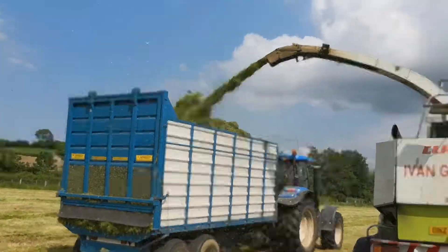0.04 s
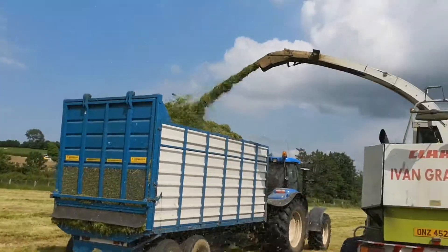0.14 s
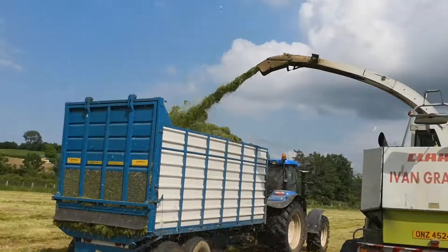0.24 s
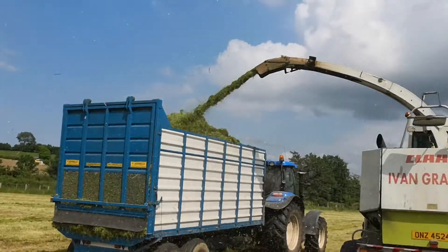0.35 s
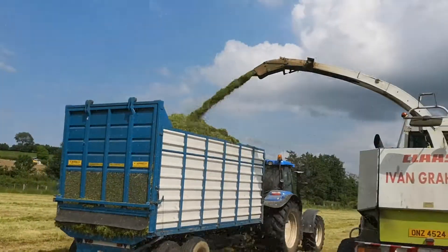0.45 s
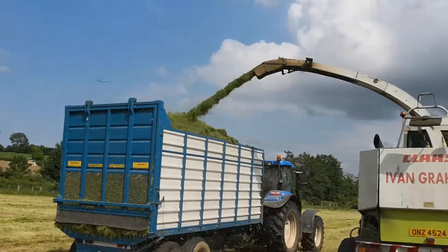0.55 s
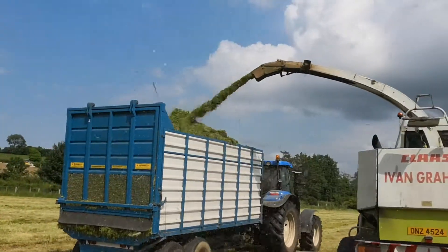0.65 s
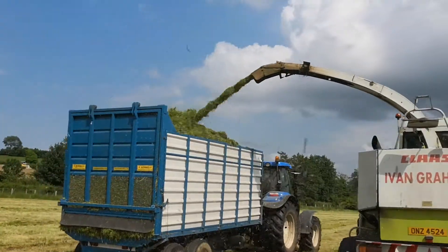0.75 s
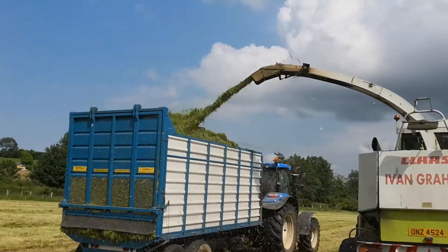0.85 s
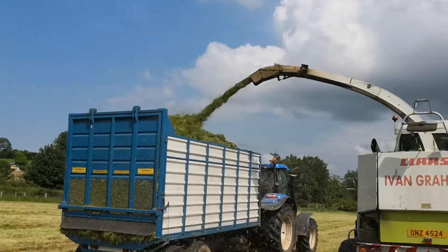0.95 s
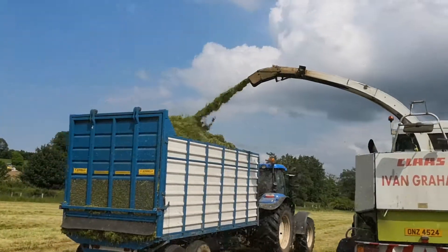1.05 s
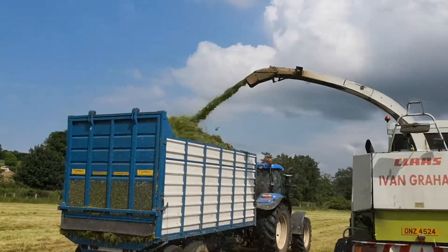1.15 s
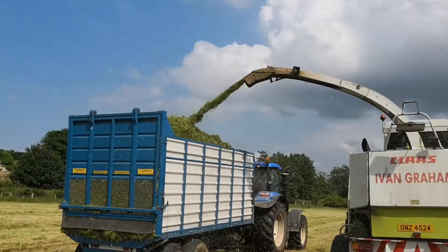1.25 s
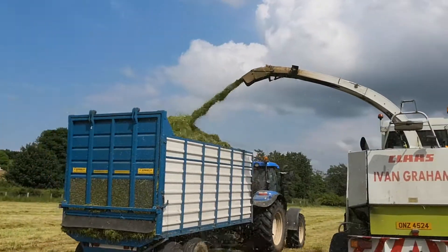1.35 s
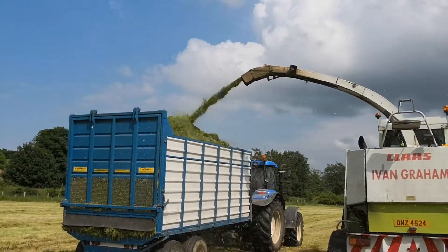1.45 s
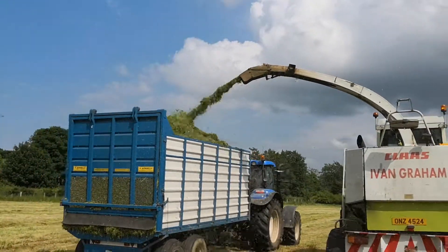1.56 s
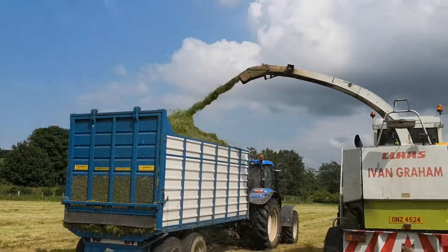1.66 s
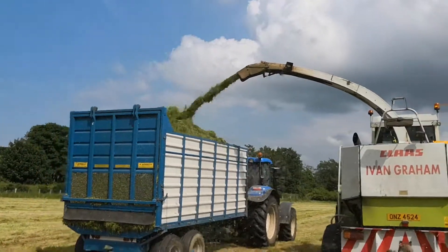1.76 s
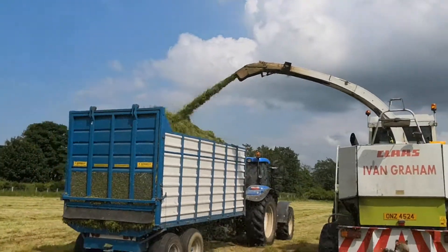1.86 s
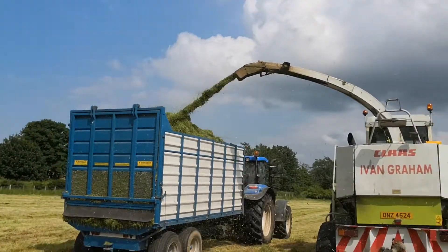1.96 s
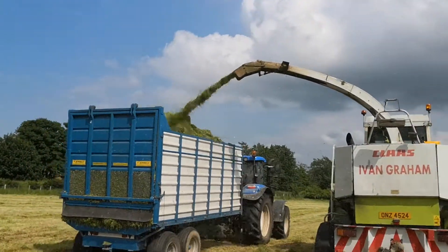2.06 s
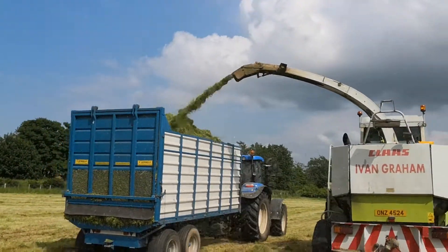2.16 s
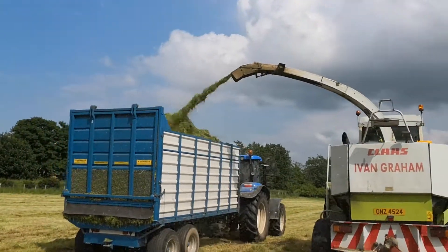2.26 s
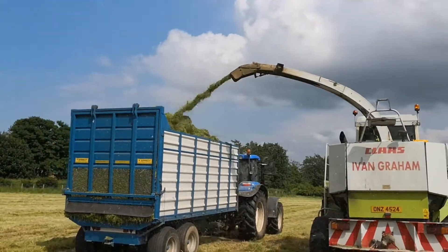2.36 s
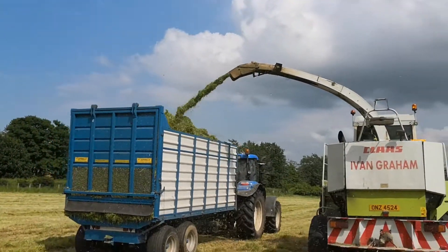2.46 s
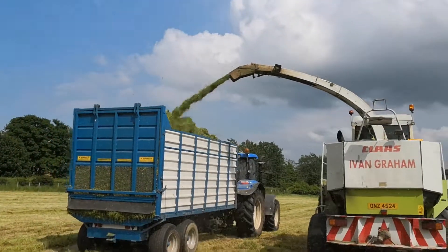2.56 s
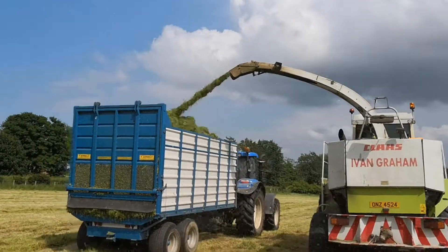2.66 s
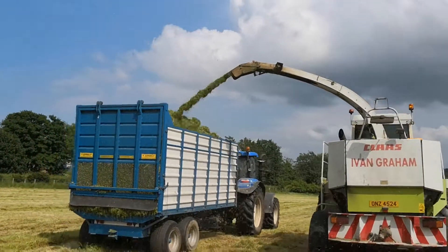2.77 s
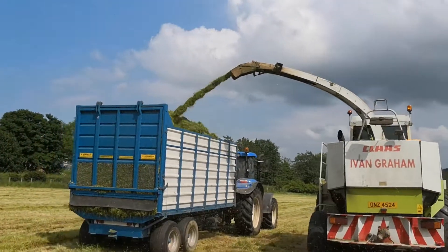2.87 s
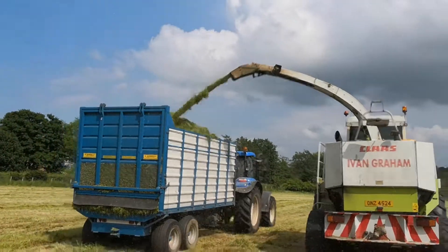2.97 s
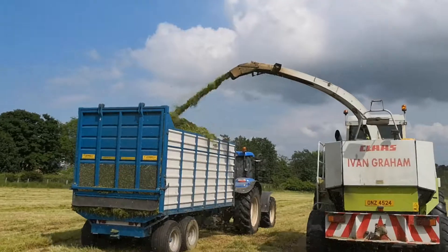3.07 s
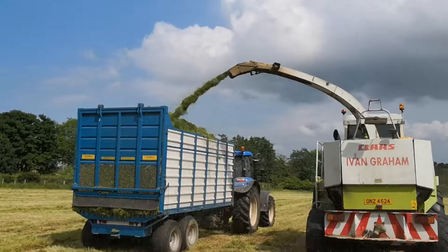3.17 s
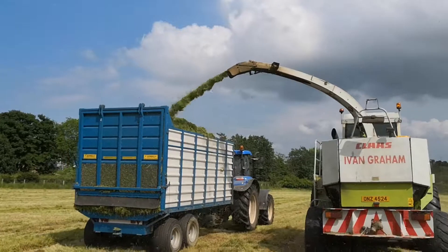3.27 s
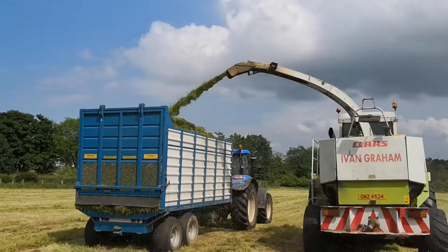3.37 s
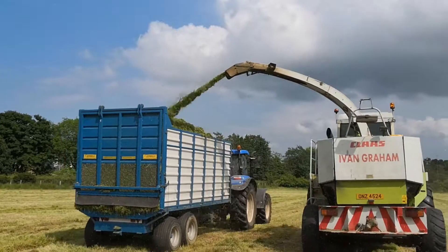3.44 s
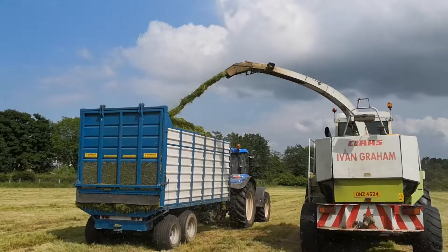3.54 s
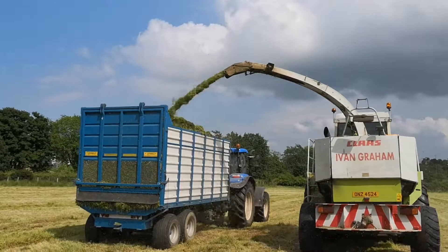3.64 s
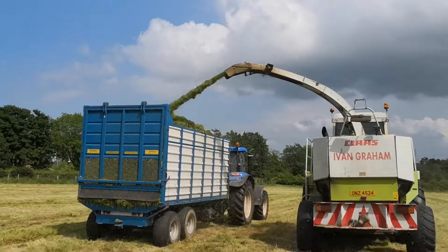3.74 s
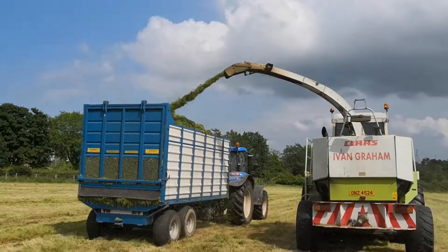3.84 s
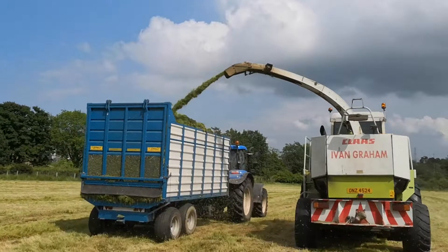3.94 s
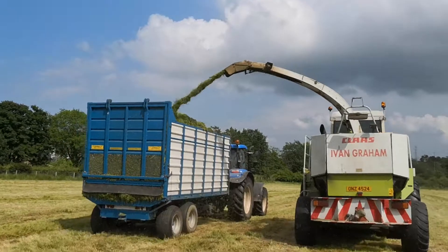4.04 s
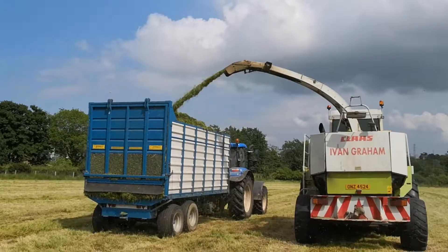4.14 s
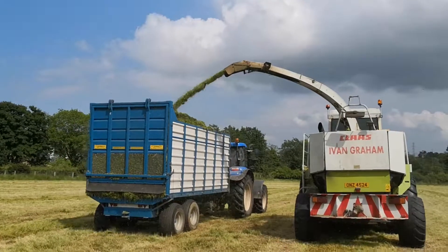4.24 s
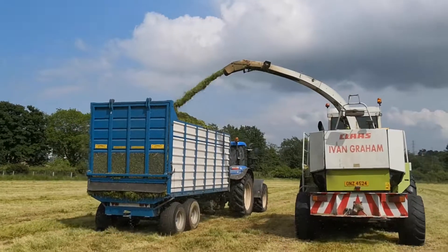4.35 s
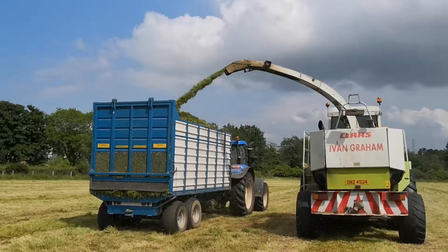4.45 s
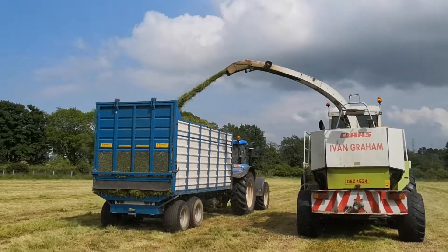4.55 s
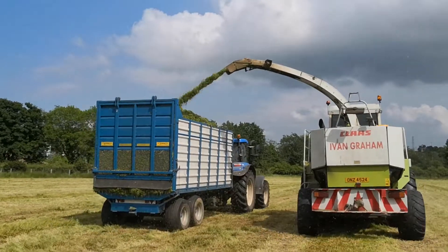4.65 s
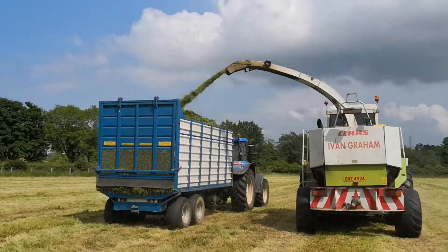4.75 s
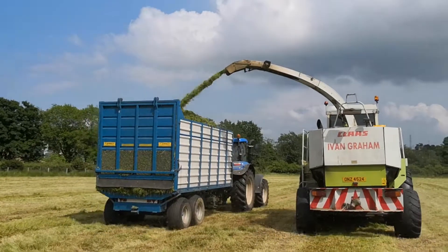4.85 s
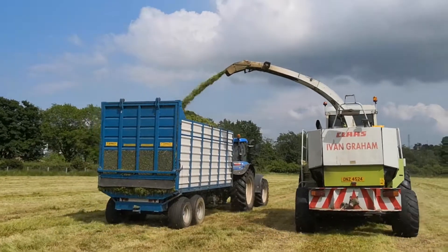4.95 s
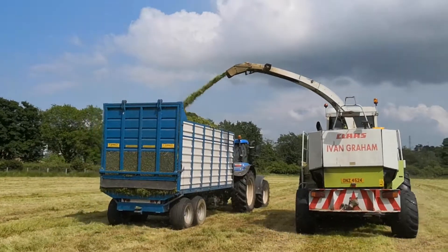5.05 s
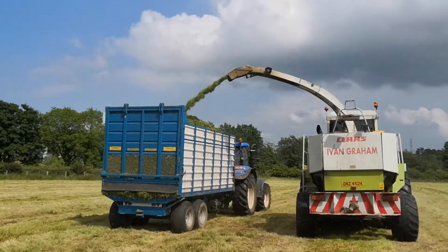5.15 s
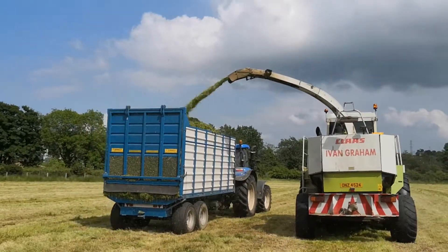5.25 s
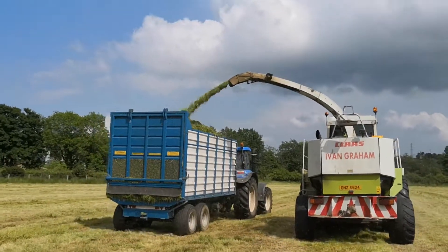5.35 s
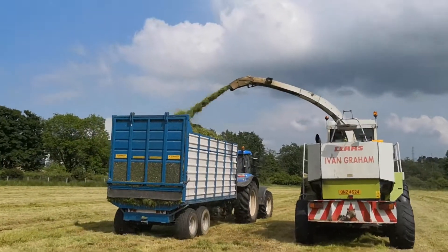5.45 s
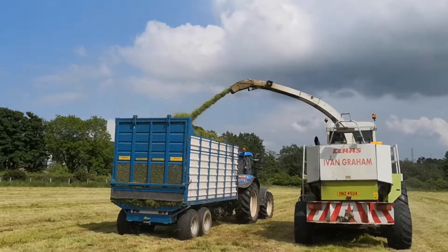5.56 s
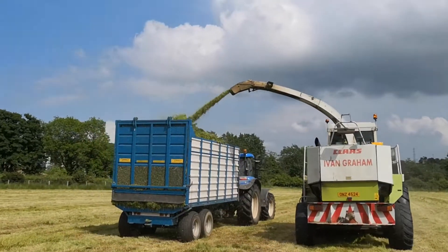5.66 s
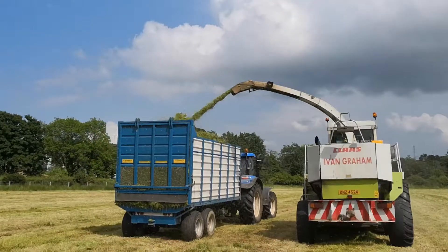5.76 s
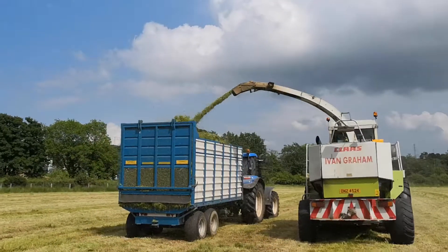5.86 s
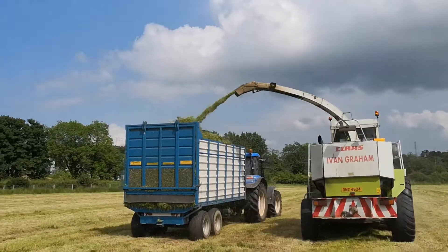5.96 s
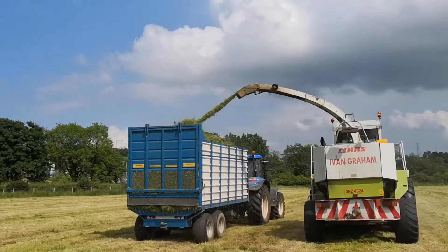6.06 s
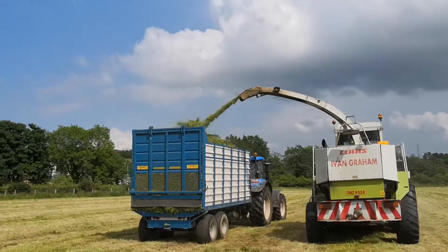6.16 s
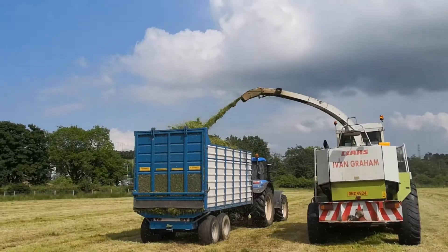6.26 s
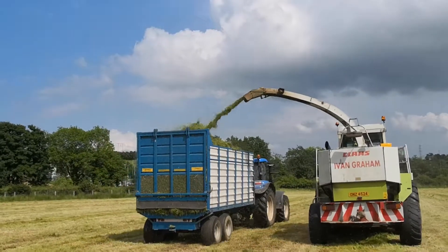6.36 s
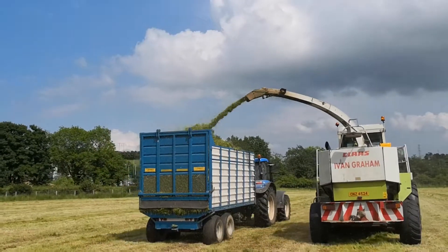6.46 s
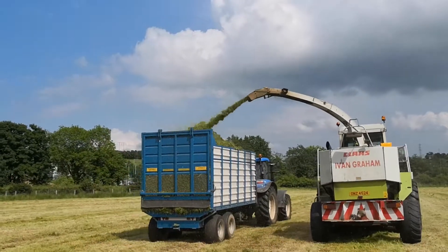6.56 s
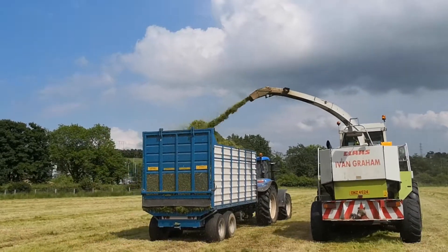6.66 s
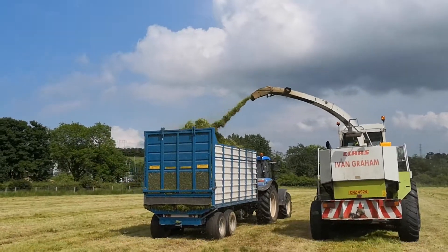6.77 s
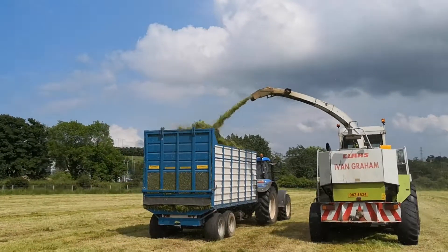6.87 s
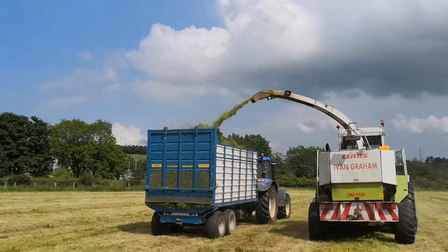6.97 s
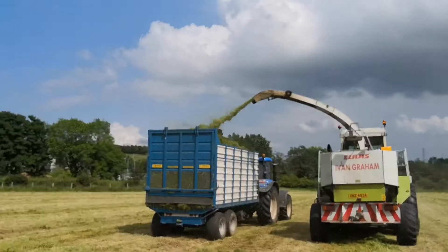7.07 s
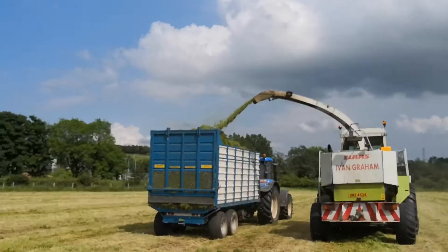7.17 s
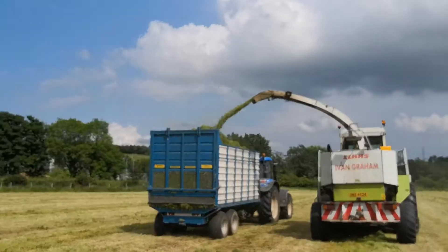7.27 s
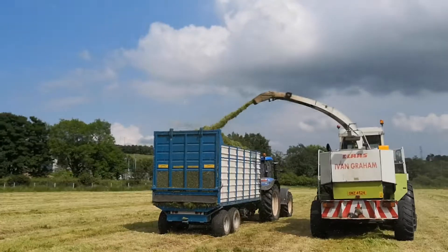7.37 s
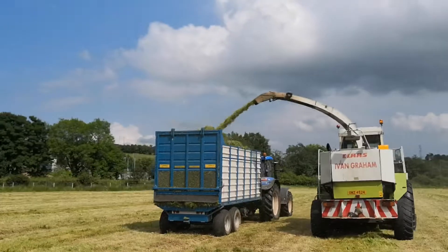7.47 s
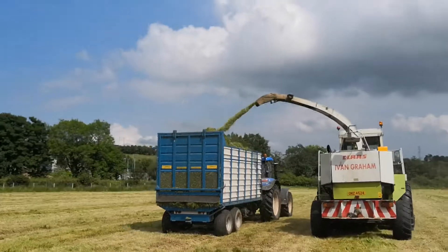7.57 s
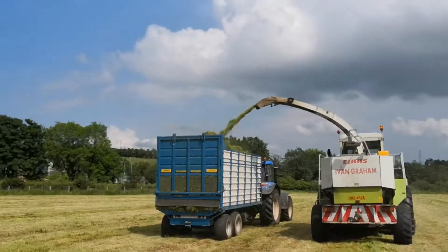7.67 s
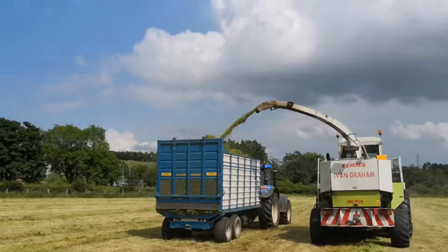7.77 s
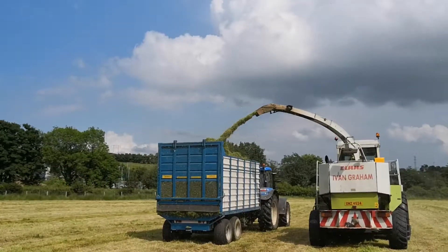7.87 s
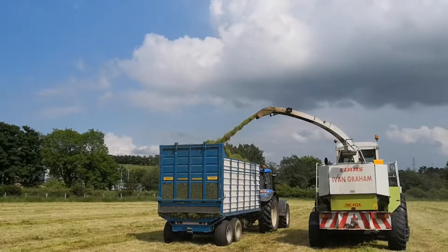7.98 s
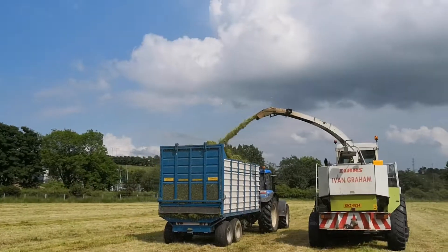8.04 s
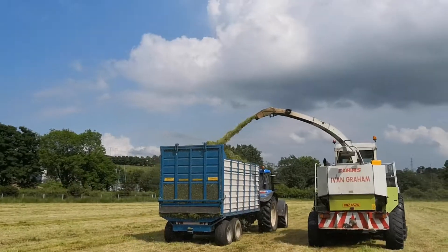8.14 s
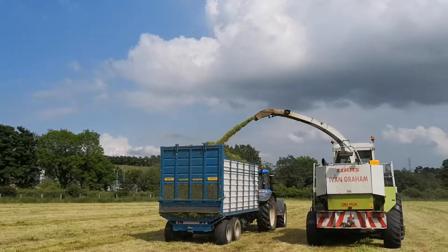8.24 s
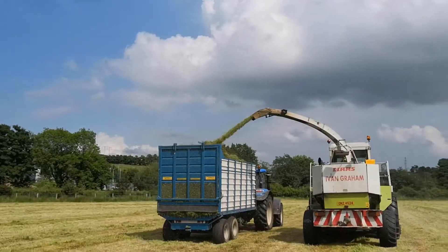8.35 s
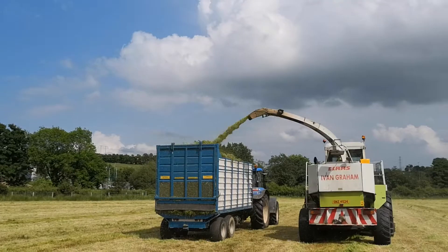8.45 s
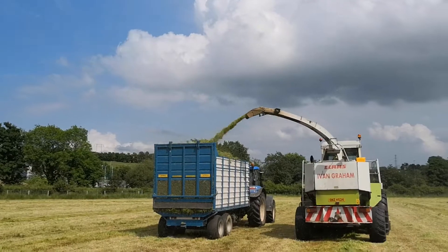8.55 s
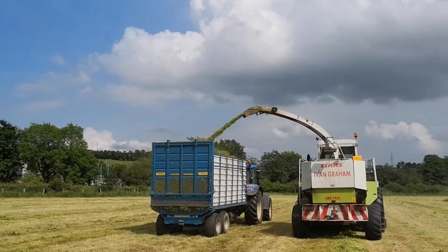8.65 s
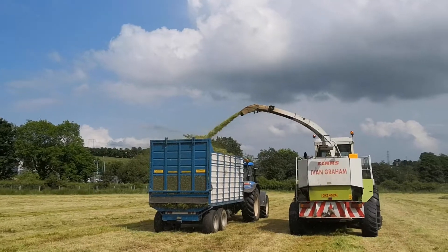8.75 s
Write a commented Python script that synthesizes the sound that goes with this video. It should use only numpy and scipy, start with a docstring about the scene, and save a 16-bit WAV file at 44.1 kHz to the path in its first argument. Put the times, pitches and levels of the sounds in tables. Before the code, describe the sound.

A forage harvester drones under load, roaring and hissing as it blows chopped grass into a trailer and slowly pulls away.

```python
"""Forage harvester driving away

An open field, two close microphone ports, and off to the left, some 12 m away, a harvester slowly
pulling off under load as it blows chopped grass into a trailer. Its eight-cylinder diesel and
belt-driven blower hunt up and down in speed together as the swath thickens and thins;
air and crop roar through the machine and hiss up the spout."""
import sys
import numpy as np
from scipy import signal
from scipy.fft import rfft, irfft, next_fast_len
from scipy.io import wavfile

SR = 44100
rng = np.random.default_rng(int(sys.argv[2]) if len(sys.argv) > 2 else 0)


def wrap_up_sound(samples):
    """Save the sound to the file named by the first command line argument, as 16-bit audio."""
    columns = np.atleast_2d(samples).T
    # keep every value between -1 and 1, then stretch to whole-number steps
    tamed = np.clip(columns, -1, 1)
    steps = np.round(tamed * 32767).astype(np.int16)
    wavfile.write(sys.argv[1], SR, steps)


N = 388521
TIME_S = np.arange(N) / SR


def from_db(db):
    """Decibels to gain."""
    return 10 ** (np.asarray(db) / 20)


def unit_rms(x):
    """Scale to unit rms."""
    return x / np.sqrt(np.mean(x ** 2) + 1e-20)


def dull(x, hz, order):
    """Roll off the treble above hz."""
    return signal.lfilter(*signal.butter(order, hz, fs=SR), x)


def in_time(rows):
    """The columns that follow a table's time column, one value per sample."""
    times, *columns = np.transpose(rows)
    return [np.interp(TIME_S, times, column) for column in columns]


def at_hz(rows, hz):
    """Read a table on a log-frequency axis."""
    row_hz, values = np.transpose(rows)
    return np.interp(np.log(hz + 1), np.log(row_hz + 1), values)


def drift(rate_hz):
    """Chance wandering: noise through a double one-pole low-pass, rms 1."""
    step = 40  # samples between points
    pole = np.exp(-2 * np.pi * step * rate_hz / SR)
    noise = rng.standard_normal(N // step + 2002)
    slow = signal.lfilter([1], [1, -2 * pole, pole * pole], noise)[2000:]
    return np.interp(np.arange(N) / step, np.arange(len(slow)), unit_rms(slow))


def swells(rows, floor_db, edge_s=.07):
    """Level in dB: a floor with swells that rise, hold and fall."""
    gain = from_db(floor_db)
    for start, length, level_db in rows:
        inside_s = np.minimum(TIME_S - start, start + length - TIME_S)
        gain = gain + from_db(level_db) * np.clip(inside_s / edge_s, 0, 1)
    return 20 * np.log10(gain)


def tone(turns, level_db, waver_db):
    """A sine locked to a shaft, its level wavering on the way through the air."""
    gain = from_db(level_db + waver_db * drift(3.9))
    return np.sqrt(2) * gain * np.sin(2 * np.pi * (turns + rng.random()))


# Noise that reaches both ports from one direction. Each row: frequency in Hz, share from 0 to 1.
PORT_LIKENESS = [(30, .98), (80, .94), (400, .8), (720, .42), (1000, .83), (1200, .68), (1400, .86),
                 (2050, .55), (2700, .76), (3200, .6), (4300, .86), (6800, .62), (9000, .55), (10500, .38)]

def field_noise(spectrum, patchy_db, bands):
    """Coloured noise, partly alike at the two ports, in bands that each swell on their own; rms 1."""
    size = next_fast_len(N)
    hz = np.arange(size // 2 + 1) * SR / size
    alike = at_hz(PORT_LIKENESS, hz)
    mid, side = rfft(rng.standard_normal((2, size))) * from_db(at_hz(spectrum, hz))
    pair = np.sqrt(1 + alike) * mid + np.sqrt(1 - alike) * side * [[1], [-1]]
    place = np.interp(np.log(hz + 1), np.log([spectrum[0][0], spectrum[-1][0]]), [0, bands - 1])
    out = 0
    for band in range(bands):
        share = np.sqrt(np.clip(1 - abs(place - band), 0, 1))  # neighbours cross-fade in power
        swell = from_db(patchy_db * (0.5 * drift(3.1) + drift(27.5)))
        out = out + irfft(pair * share, size)[:, :N] * swell
    return unit_rms(out)


# The machine's low end across the field. Each row: frequency in Hz, spectral level in dB.
RUMBLE_SPECTRUM = [(20, -25), (45, -2), (90, 1.5), (130, 5), (180, -3.5), (230, 10), (280, -3.5), (380, -5),
                   (550, -14.5), (800, -64)]

def rumble(level_db, deep_extra=.92, deep_fade_s=1):
    """A rumble that throbs unevenly, its deepest part stronger at first."""
    throb_db = 1.5 * drift(6.8)
    body = from_db(level_db + throb_db) * field_noise(RUMBLE_SPECTRUM, patchy_db=.83, bands=4)
    deep_gain = deep_extra * np.exp(-(TIME_S / deep_fade_s) ** 2)
    return body + deep_gain * dull(body, hz=80, order=2)


# Faint squeaks. Each row: middle in seconds, length in seconds, pitch in Hz, level in dB.
METAL_SQUEAKS = [(3.81, .05, 3030, -39), (4.13, .05, 2830, -39), (4.29, .07, 2900, -39),
                 (4.31, .05, 3450, -41), (4.42, .03, 2900, -37), (6.68, .04, 3080, -42),
                 (6.9, .045, 3140, -41), (7.015, .04, 3120, -43), (8.285, .055, 3075, -38),
                 (8.405, .035, 3070, -40), (8.44, .065, 2998, -37), (8.495, .03, 3050, -41)]

def squeaks(fall_hz_per_s=500):
    """Sheet metal squeaks briefly near 3 kHz, sinking a little, with a fainter partial above."""
    out = np.zeros((2, N))
    late_s = np.array([[65e-6], [-65e-6]])  # offsets the left port's lead, so the squeaks sound centred
    shiver = .1 * drift(25)
    for middle, length, hz, level_db in METAL_SQUEAKS:
        span = slice(int((middle - length) * SR), int((middle + length) * SR))
        t = TIME_S[span] - middle - late_s
        phase = 2 * np.pi * ((hz - fall_hz_per_s * t / 2) * t + shiver[span])
        envelope = np.sqrt(2) * from_db(level_db) * np.exp(-(2 * t / length) ** 4)
        out[:, span] += envelope * (np.sin(phase) + from_db(-6) * np.sin(1.27 * phase))
    return out


# Swells of the lower and upper gear tone. Each row: start in seconds, length in seconds, level in dB.
LOWER_GEAR_SWELLS = [(-.1, .75, -38), (.85, .45, -43), (1.27, .33, -36), (1.6, .16, -35), (1.68, .3, -29.5),
                     (2.01, .18, -35), (2.35, .2, -41), (4.6, .45, -40), (6.2, .22, -40)]
UPPER_GEAR_SWELLS = [(3.85, .3, -43), (4.5, .3, -42), (5.75, .4, -43), (7.3, .42, -41), (8.15, .32, -41)]

def gear_whine(cycles):
    """Teeth meet 100 and 108 times an engine cycle: two whistles that swell and die."""
    backlash = .085 * drift(30)  # tooth play jitters the contacts
    lower = tone(100 * cycles + backlash, swells(LOWER_GEAR_SWELLS, floor_db=-47), waver_db=2)
    upper = tone(108 * cycles, swells(UPPER_GEAR_SWELLS, floor_db=-51), waver_db=2)
    return lower + upper


# Noise from inside the machine. Each row: time in seconds, roar level in dB, knife level in dB.
MACHINE_LEVELS = [(0, -23.5, -29), (.35, -24.5, -27.5), (.65, -24.5, -34), (.86, -25.5, -34),
                  (1.04, -25.5, -28), (1.25, -26.5, -36.5), (1.45, -27, -34), (1.8, -25, -33.5),
                  (2.1, -26, -34.5), (2.45, -25.5, -31), (3.3, -25, -29), (3.9, -25.5, -29.5),
                  (4.35, -25.5, -28.5), (5.05, -27, -32.5), (5.35, -25.5, -31), (5.7, -28, -33.5),
                  (6.7, -28, -32.5), (7.2, -29.5, -34.5), (7.5, -29, -34.5), (8.0, -29, -33),
                  (8.4, -29, -31), (8.81, -29, -31.5)]
# Colours of the roar and the knives. Each row: frequency in Hz, spectral level in dB.
ROAR_SPECTRUM = [(300, -45), (500, -3.5), (900, -6), (1050, -3.5), (1200, -4), (1450, -4), (1550, -2.5),
                 (1650, 0.5), (1750, -3), (1850, -1.5), (1950, -1), (2050, 1), (2300, -4.5), (2600, -6),
                 (3200, -15.5), (4000, -71)]
KNIFE_SPECTRUM = [(1800, -16), (2400, -1), (3000, 1.5), (3600, 0), (4200, -5), (5000, -10), (6000, -70)]

def roar_and_knives():
    """Air and crop roar through the machine; the chopping knives make a brighter rush."""
    roar_db, knives_db = in_time(MACHINE_LEVELS)
    roar = from_db(roar_db) * field_noise(ROAR_SPECTRUM, patchy_db=.9, bands=5)
    knives = from_db(knives_db) * field_noise(KNIFE_SPECTRUM, patchy_db=2, bands=3)
    return roar, knives


# Flow of crop up the spout. Each row: time in seconds, hiss level in dB.
CROP_FLOW = [(0, -33), (.11, -30), (.44, -30), (.58, -36.5), (.87, -38.5), (.98, -31.5), (1.1, -39),
             (1.37, -39.5), (1.65, -33), (1.76, -34.5), (1.85, -38.5), (2.4, -38), (2.53, -34.5),
             (2.7, -37), (3.0, -35.5), (3.13, -30.5), (3.21, -35), (3.3, -31), (3.45, -37), (3.68, -30),
             (3.97, -39.5), (4.33, -32), (4.6, -36.5), (5.1, -40), (5.33, -36.5), (5.7, -39.5),
             (6.25, -38.5), (6.47, -34), (7.2, -44.5), (7.48, -40.5), (7.9, -42.5), (8.2, -37),
             (8.81, -44.5)]
# Thick wads leaving while the spout is near. Each row: start in seconds, length in seconds, level in dB.
WAD_GUSTS = [(.04, 0.44, -29.5), (.86, 0.39, -35.5), (1.46, 0.37, -33.5), (3.25, 0.12, -45)]
# Colours of the spout's three noises. Each row: frequency in Hz, spectral level in dB.
SPRAY_SPECTRUM = [(2800, 0), (3800, 6), (4600, 7.5), (5400, 6.5), (6300, 1.5), (7000, -18), (8000, -41)]
GUST_SPECTRUM = [(4200, -35), (4800, 5), (5500, 3.5), (6300, -4), (7000, 3), (7600, -36), (11500, -47),
                 (12500, -30), (14500, -30), (15200, -30)]
HISS_SPECTRUM = [(5600, -6.5), (6500, 0.5), (7300, 7.5), (7800, 6.5), (8300, -8.5), (9000, -18.5),
                 (10000, -40), (10600, -15), (11500, -24.5), (15000, -26.5)]

def spout(fade_db, near_spray_db=-32, mean_flow_db=-36):
    """Chopped grass hisses up the spout and sprays out, with bright gusts as thick wads leave."""
    hiss_db, = in_time(CROP_FLOW)
    follows_flow = .79 * from_db(fade_db)  # the spray's surges blur with distance
    spray_db = near_spray_db + follows_flow * (hiss_db - mean_flow_db) + .96 * fade_db
    spray = from_db(spray_db) * field_noise(SPRAY_SPECTRUM, patchy_db=2.3, bands=2)
    gusts = from_db(swells(WAD_GUSTS, floor_db=-70)) * field_noise(GUST_SPECTRUM, patchy_db=1, bands=1)
    hiss = from_db(hiss_db) * field_noise(HISS_SPECTRUM, patchy_db=1.5, bands=2)
    return spray + gusts + hiss


# A close reflection. Each row: time in seconds, roar lag left and right in ms, roar echo level in dB,
# crop lag in ms, crop echo level in dB.
CLOSE_ECHO = [(0, 2.12, 2.3, -17, 2.7, -16), (1.1, 2.16, 2.3, -13, 2.4, -16),
              (3, 2.12, 2.36, -11, 2.32, -8), (4.2, 2.14, 2.38, -11, 2.32, -7),
              (5.8, 2.1, 2.38, -8, 2.46, -12), (7.2, 2.13, 2.38, -8, 2.44, -14),
              (8.81, 2.15, 2.38, -7, 2.3, -11)]

def close_echo(roar, crop):
    """A dull echo that, added to the direct noise, combs it into stripes some 450 Hz apart."""
    def delayed(pair, lags_ms):
        return np.array([np.interp(TIME_S - ms / 1000, TIME_S, x) for x, ms in zip(pair, lags_ms)])

    left_ms, right_ms, roar_db, crop_ms, crop_db = in_time(CLOSE_ECHO)
    dull_roar = dull(roar, hz=2000, order=1) * [[1], [-1]]  # inverted on the right
    roar_echo = from_db(roar_db) * delayed(dull_roar, (left_ms, right_ms))
    crop_echo = from_db(crop_db) * delayed(dull(crop, hz=4200, order=2), (crop_ms, crop_ms))
    return roar_echo + crop_echo


# The paddle tone and its 2nd harmonic. Each row: time in seconds, level in dB.
PADDLE_FIRST = [(0.0, -31), (0.2, -15), (0.4, -33), (0.5, -17), (0.6, -29), (1.0, -21), (1.1, -32),
                (1.42, -20.5), (1.68, -21), (1.78, -49), (1.96, -28), (2.08, -43), (2.36, -26), (2.46, -45),
                (2.68, -30), (2.76, -42), (2.86, -22), (3.24, -30), (3.36, -17.5), (3.54, -29), (3.68, -40),
                (4.22, -19), (4.4, -34), (4.56, -20), (4.72, -42), (4.82, -21), (4.96, -39), (5.24, -21),
                (5.4, -30), (5.56, -19.5), (5.82, -29.5), (6.1, -29), (6.22, -24), (6.34, -40), (6.42, -29),
                (6.64, -23), (6.94, -28), (7.06, -39), (7.2, -29), (7.78, -44), (7.88, -28), (8.2, -34.5),
                (8.38, -23), (8.8, -35)]
PADDLE_SECOND = [(0.0, -26), (0.12, -22), (0.36, -28), (0.66, -23), (1.02, -43), (1.14, -26), (1.66, -34),
                 (2.16, -26), (2.26, -43), (2.46, -29), (2.54, -37), (2.66, -35), (2.76, -40), (2.86, -26),
                 (3.06, -22.5), (3.26, -44), (3.78, -26), (4.14, -40.5), (4.22, -34), (4.4, -39),
                 (4.52, -29), (4.78, -29), (5.02, -28), (5.1, -40), (5.24, -42), (5.38, -30), (5.6, -40),
                 (5.7, -29.5), (5.94, -25.5), (6.26, -33), (6.36, -27), (6.62, -30), (6.72, -42),
                 (6.82, -32), (6.98, -42), (7.1, -32), (7.26, -42), (7.54, -23.5), (7.84, -48), (8.06, -32),
                 (8.18, -42), (8.58, -42), (8.7, -29), (8.8, -36)]
# Overtones at mean speed. Each row: time in seconds, levels of the 3rd, 4th and 5th harmonic in dB.
PADDLE_OVERTONES = [(0, -30.5, -33, -33), (.32, -34, -35.5, -43), (.6, -24, -24, -35), (.85, -29, -30, -33),
                    (1.15, -28, -30.5, -36), (1.3, -29, -46, -31), (1.4, -30.5, -36.5, -46),
                    (1.55, -29.5, -37, -35), (2.0, -38, -30, -53), (2.4, -31.5, -42, -43),
                    (2.9, -32.5, -44, -47), (3.25, -44.5, -43.5, -45), (3.85, -23.5, -38, -43),
                    (4.2, -44.5, -47, -40), (4.8, -25.5, -44, -49), (5.25, -51, -43, -38),
                    (5.65, -40, -38, -47), (6.0, -37, -50, -37), (6.35, -41.5, -42.5, -42.5),
                    (6.95, -34.5, -41, -38), (7.3, -36.5, -40.5, -47), (7.55, -45, -41.5, -44),
                    (7.85, -36, -43.5, -63), (8.35, -45, -44, -40.5), (8.81, -54, -43, -42)]
# The 6th and 7th harmonic, in dB relative to the 4th.
PADDLE_UPPER_DB = [-7.5, -10.5]

def blower(passes, sag, rumble_db):
    """Each paddle thumps a slug of air and crop into the spout: a drone, uneven as the slugs differ."""
    first_db, = in_time(PADDLE_FIRST)
    second_db, = in_time(PADDLE_SECOND)
    third_db, fourth_db, fifth_db = in_time(PADDLE_OVERTONES)
    labour_db = 2.5 * sag
    levels = [first_db, second_db, third_db + labour_db, fourth_db + labour_db, fifth_db]
    levels += [fourth_db + labour_db + upper_db for upper_db in PADDLE_UPPER_DB]
    levels.append(rumble_db - 23)  # 8th harmonic
    slugs = passes + .022 * drift(10)  # each leaves a little early or late
    return sum(tone(k * slugs, level_db, waver_db=1.5) for k, level_db in enumerate(levels, 1))


# The diesel's firing tone from across the field. Each row: time in seconds, level in dB.
FIRING_LEVEL = [(0.0, -28), (0.6, -16.5), (1.2, -14), (1.34, -17), (1.42, -30), (1.52, -18), (1.66, -23.5),
                (1.84, -13), (2.24, -22.5), (2.34, -34), (2.44, -23), (2.64, -32), (2.88, -16.5),
                (3.0, -42), (3.08, -25), (3.22, -40), (3.9, -17), (4.0, -21), (4.08, -25), (4.16, -23),
                (4.46, -27), (4.68, -20.5), (5.3, -26.5), (5.42, -36), (5.58, -24), (5.78, -25),
                (5.88, -26), (5.96, -42), (6.06, -26), (6.2, -33), (6.34, -19), (6.52, -42), (6.62, -29),
                (6.78, -25.5), (6.96, -25), (7.06, -39), (7.16, -22.5), (7.24, -21.5), (7.64, -43),
                (7.84, -20.5), (8.12, -32), (8.2, -40), (8.38, -26.5), (8.8, -28)]
# Tones of uneven cylinders, pipes and gears: multiples of the engine cycle, then dB against the rumble.
SIDE_ORDERS = [4, 5, 6, 7, 10, 11, 12, 16, 18, 19.7, 23, 25, 32, 46, 52.6, 80, 92, 115]
SIDE_ORDER_DB = [-21, -19, -19, -10.5, -12, -11.5, -16, -17, -18.5, -15.5, -27.5, -27.5, -32.5, -32, -33.5,
                 -41, -32, -22.5]

def diesel(cycles, sag, fade_db, rumble_db):
    """Eight firings a cycle, a ninth order that grows as the drive labours, and others that wander."""
    ninth_db = -27 + 2.14 * sag + 1.26 * fade_db + 1.5 * drift(3.9)
    firing_db, = in_time(FIRING_LEVEL)
    out = tone(8 * cycles, firing_db, waver_db=1) + tone(9 * cycles, ninth_db, waver_db=2)
    crank = cycles + .007 * drift(4)  # runs a little early or late
    for order, level_db in zip(SIDE_ORDERS, SIDE_ORDER_DB):
        swell_db = 3 * drift(1.2)
        out += tone(order * crank, rumble_db + level_db + swell_db, waver_db=2.5)
    return out


# Turning points of the drive's hunting. Each row: time in seconds, paddle passes per second.
DRIVE_SPEED = [(0, 108.9), (.28, 107.8), (.62, 110.8), (1.15, 110.4), (1.54, 106.8), (1.89, 112.1),
               (2.08, 111.9), (2.42, 106.4), (2.78, 109.9), (3.1, 107.7), (3.5, 108.2), (3.78, 111.2),
               (4.2, 106.7), (4.64, 111.4), (5.25, 107), (5.6, 110.5), (5.8, 109.1), (6.06, 110.1),
               (6.34, 107.2), (6.82, 111.2), (7.22, 107.7), (7.52, 109.9), (7.9, 107.4), (8.32, 110.3),
               (8.81, 110.3)]

def drive_speed():
    """Paddle passes per second, swinging in half cosines as the load comes and goes."""
    times, speeds = np.transpose(DRIVE_SPEED)
    rows = np.arange(len(times))
    row, fraction = np.divmod(np.interp(TIME_S, times, rows), 1)
    return np.interp(row + (1 - np.cos(np.pi * fraction)) / 2, rows, speeds)


START_M, AWAY_M_PER_S = 12.3, 1.39
MEAN_PASSES_PER_S, CYCLES_PER_PASS = 109, .1486  # the belt ties engine cycles to paddle passes

def scene():
    """The receding harvester: tones of one shared drive over the noise of machine and crop."""
    speed = drive_speed()
    sag = MEAN_PASSES_PER_S - speed  # positive when the drive labours
    passes = np.cumsum(speed) / SR
    cycles = CYCLES_PER_PASS * passes  # two crank turns each
    fade_db = -20 * np.log10(1 + AWAY_M_PER_S * TIME_S / START_M)  # 1 / distance
    rumble_db = -21 + fade_db
    tones = diesel(cycles, sag, fade_db, rumble_db) + gear_whine(cycles)
    tones = tones + blower(passes, sag, rumble_db) + squeaks()
    low_end = rumble(rumble_db)
    roar, knives = roar_and_knives()
    crop = knives + spout(fade_db)
    return low_end + roar + crop + close_echo(roar, crop) + tones


# Colour of the two microphone ports. Each row: frequency in Hz, left minus right in dB.
LEFT_BALANCE = [(200, 0), (300, -1.5), (600, 2), (800, 4), (1150, 0), (1400, -4), (1650, -6.5), (1950, -4),
                (2200, -4.5), (2500, 5.5), (3200, 2.5), (3900, -2.5), (5200, -3), (6000, -0.5),
                (7200, -8.5), (8000, 4.5), (11000, 1)]
# Sound arriving from the left. Each row: frequency in Hz, lead of the left port in radians.
LEFT_LEAD = [(100, .03), (220, .2), (340, .85), (560, .8), (720, 1.4), (850, .5), (1800, 1), (2400, 2.4),
             (3500, 2.5), (4300, 3.1), (5700, 4.2), (6900, 5.3), (7800, 7.2), (8400, 6.3)]

def record(dry, ceiling=1.3, cutoff_hz=15250):
    """Each port has its own colour and the left one hears first; peaks are rounded, the top is cut."""
    size = next_fast_len(N + SR // 10)
    hz = np.arange(size // 2 + 1) * SR / size
    left = from_db(at_hz(LEFT_BALANCE, hz) / 2) * np.exp(.5j * at_hz(LEFT_LEAD, hz))
    ports = irfft(rfft(dry, size) * np.array([left, 1 / left]), size)[:, :N]
    rounded = ceiling * np.tanh(ports / ceiling)
    return signal.sosfilt(signal.cheby2(24, 60, cutoff_hz, fs=SR, output="sos"), rounded)


dry = scene()
out = record(dry)
wrap_up_sound(out)
```